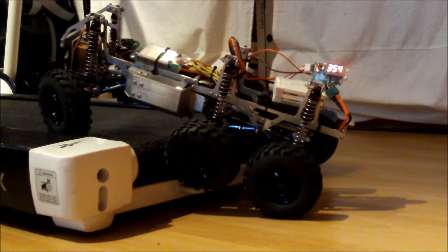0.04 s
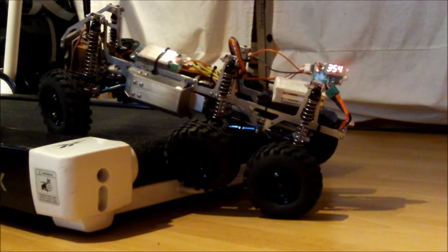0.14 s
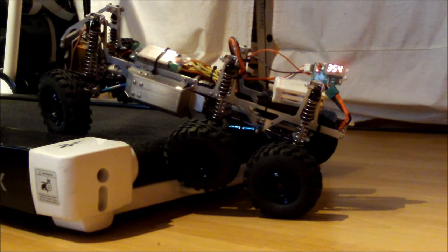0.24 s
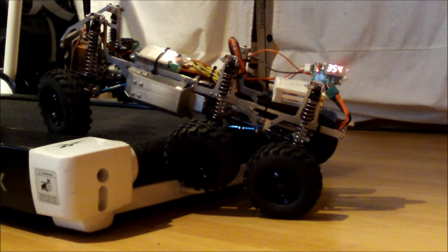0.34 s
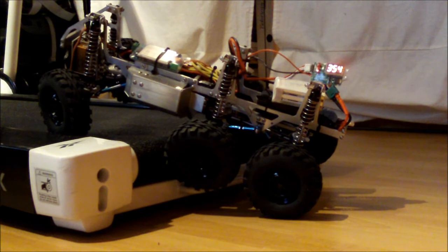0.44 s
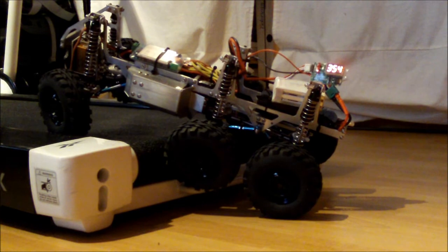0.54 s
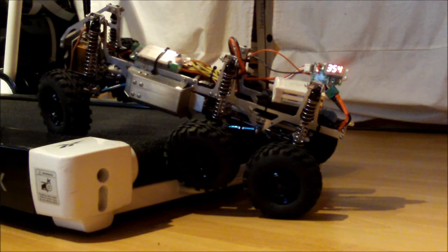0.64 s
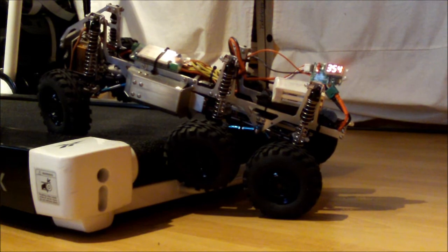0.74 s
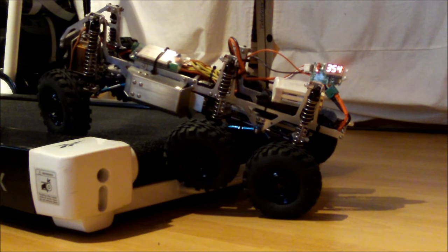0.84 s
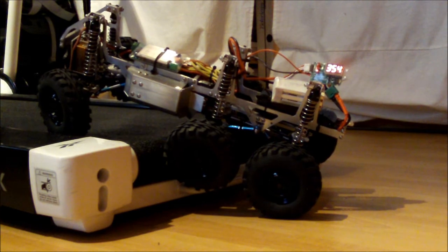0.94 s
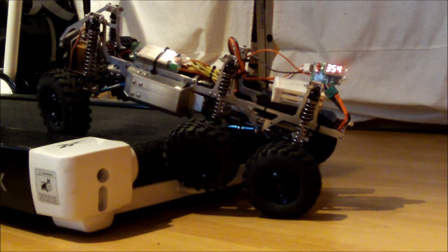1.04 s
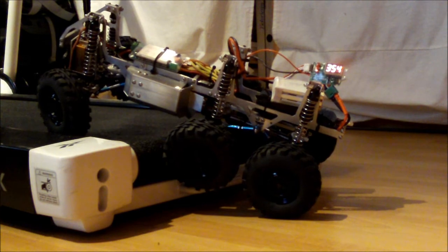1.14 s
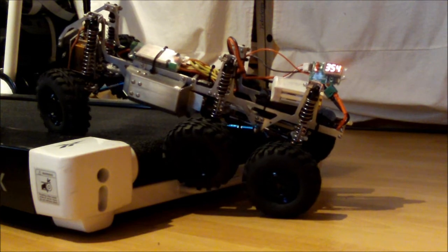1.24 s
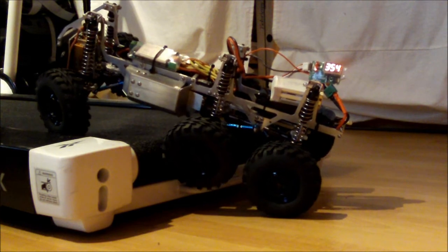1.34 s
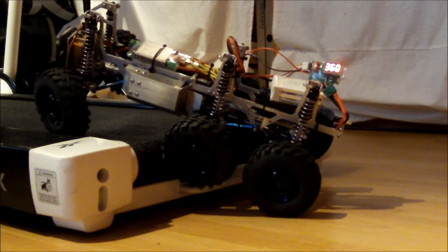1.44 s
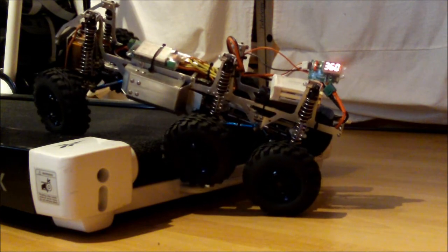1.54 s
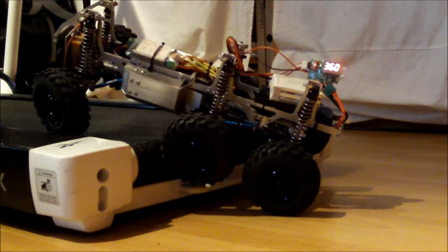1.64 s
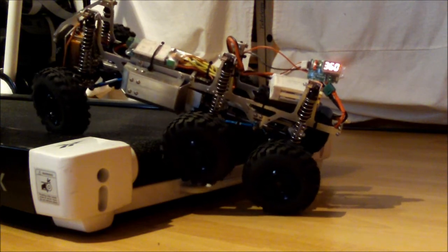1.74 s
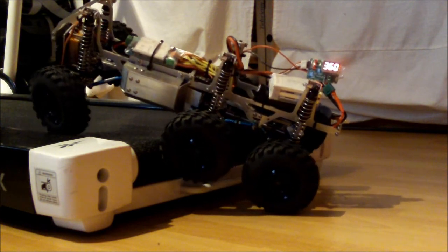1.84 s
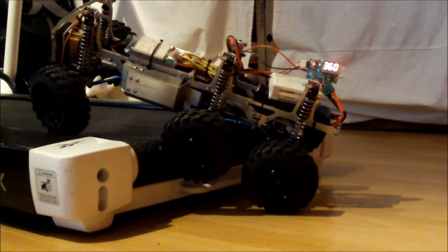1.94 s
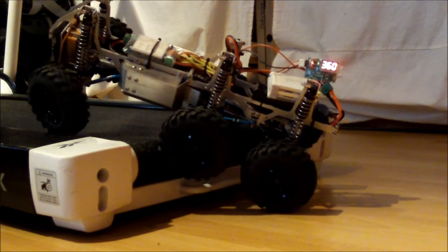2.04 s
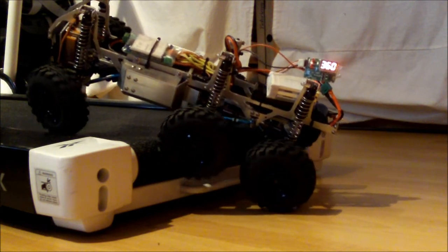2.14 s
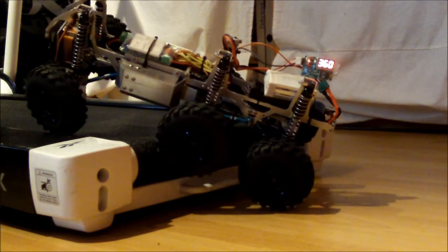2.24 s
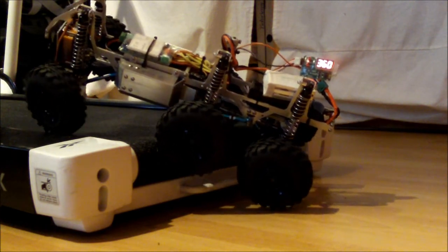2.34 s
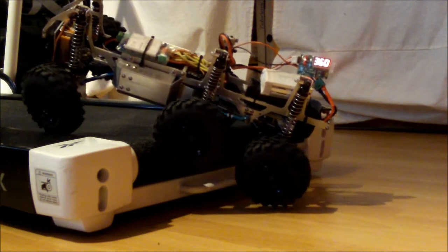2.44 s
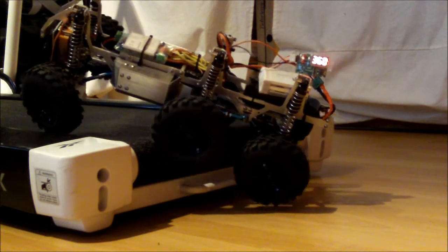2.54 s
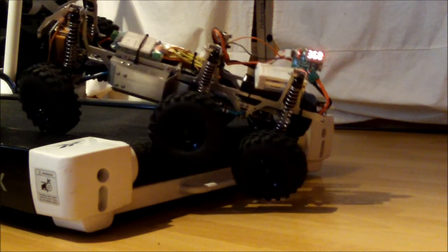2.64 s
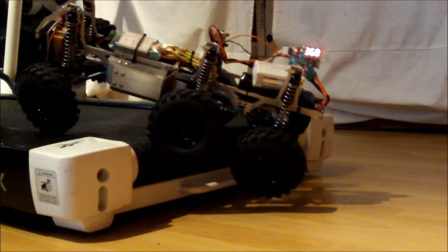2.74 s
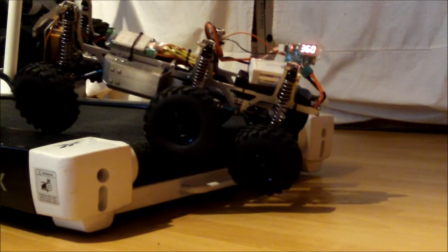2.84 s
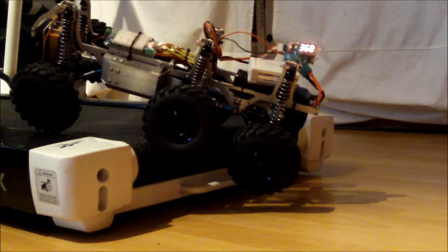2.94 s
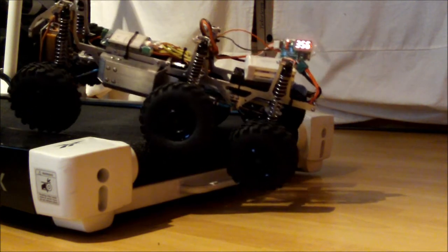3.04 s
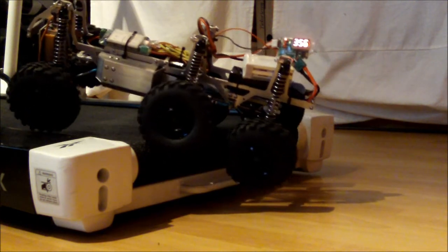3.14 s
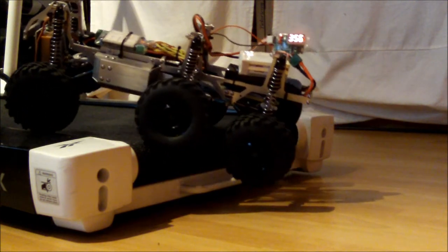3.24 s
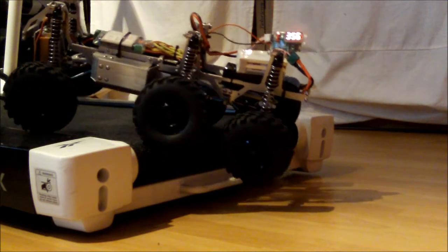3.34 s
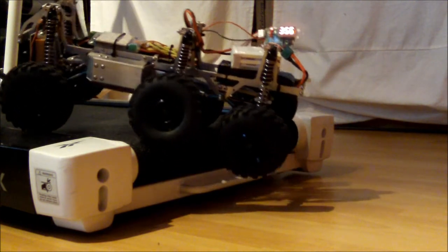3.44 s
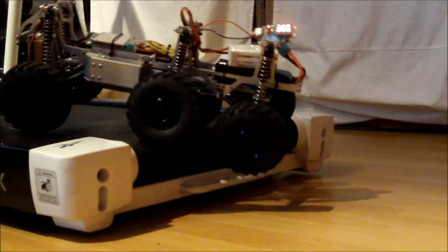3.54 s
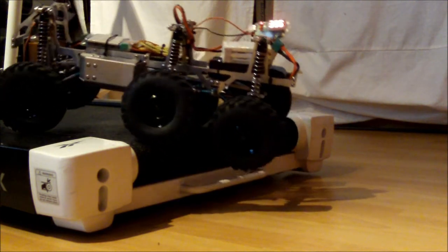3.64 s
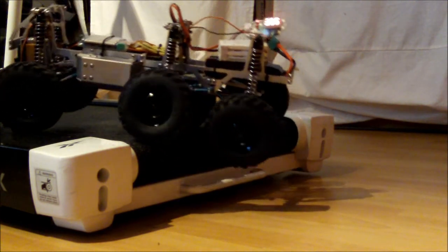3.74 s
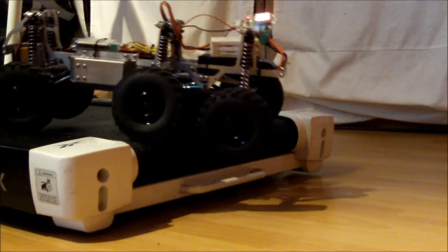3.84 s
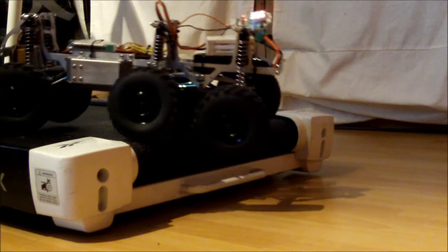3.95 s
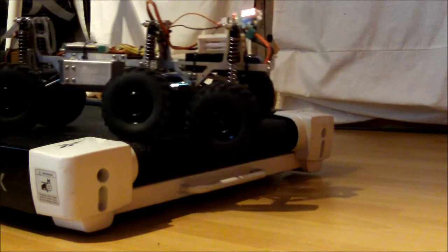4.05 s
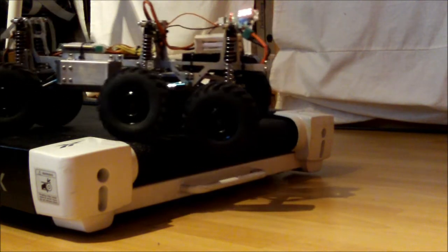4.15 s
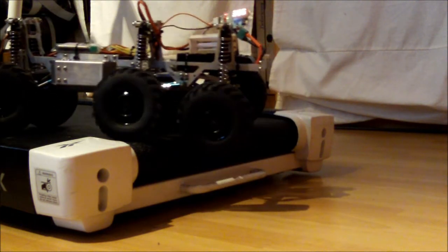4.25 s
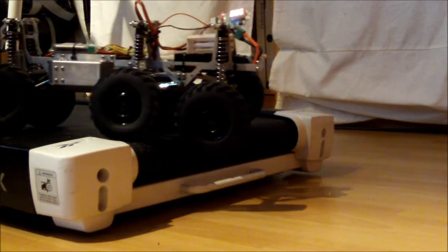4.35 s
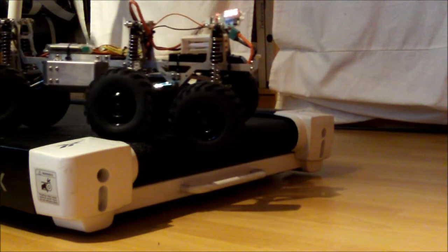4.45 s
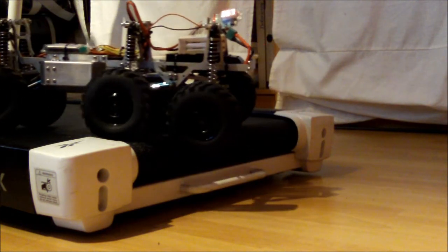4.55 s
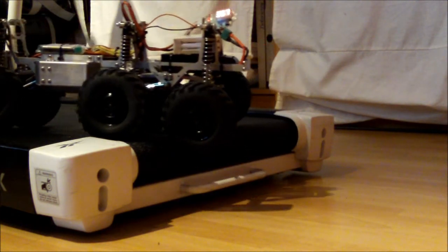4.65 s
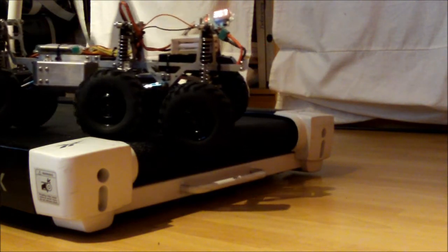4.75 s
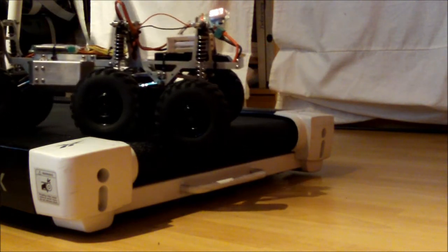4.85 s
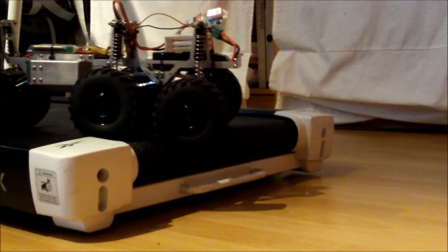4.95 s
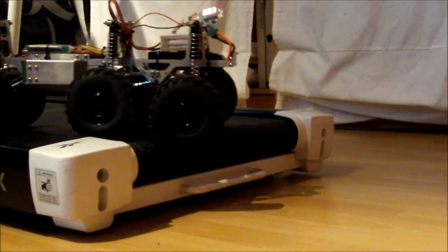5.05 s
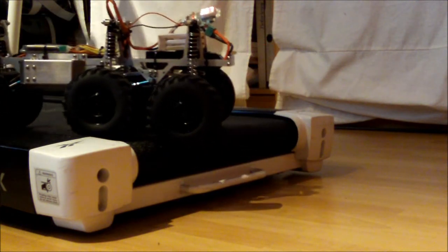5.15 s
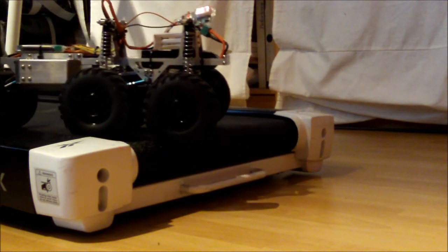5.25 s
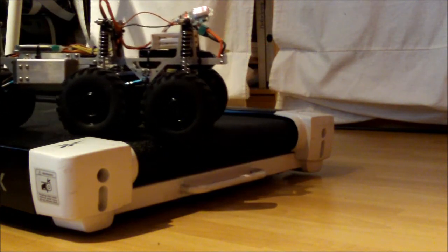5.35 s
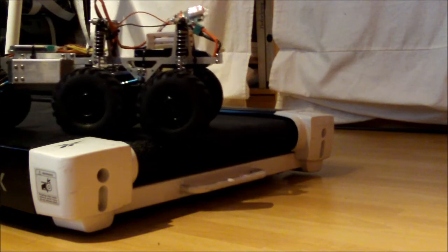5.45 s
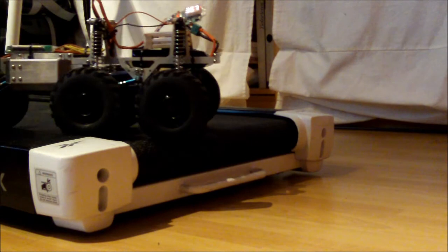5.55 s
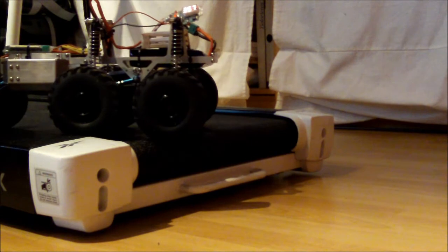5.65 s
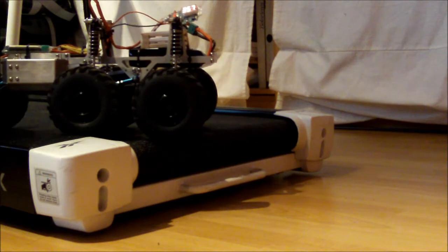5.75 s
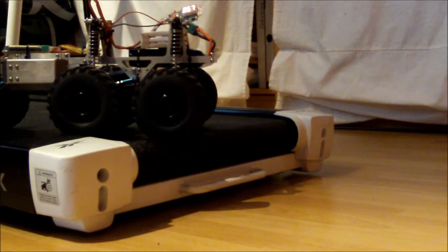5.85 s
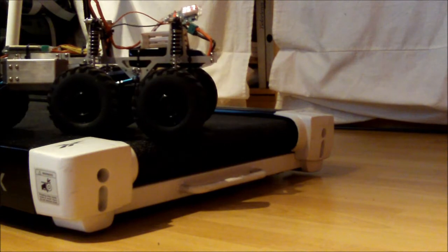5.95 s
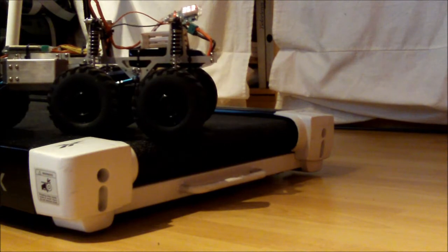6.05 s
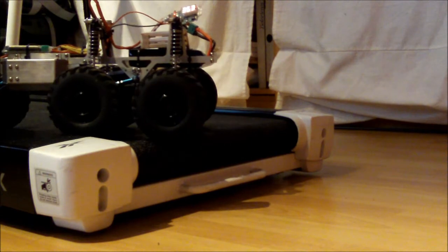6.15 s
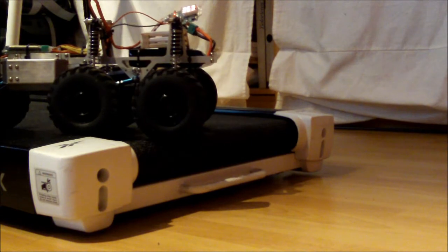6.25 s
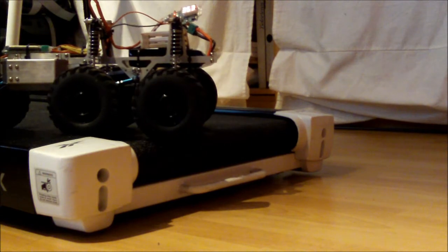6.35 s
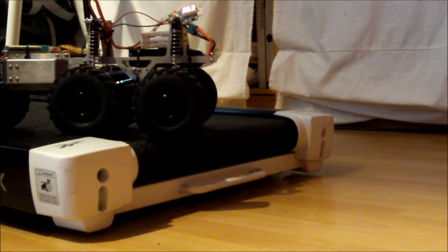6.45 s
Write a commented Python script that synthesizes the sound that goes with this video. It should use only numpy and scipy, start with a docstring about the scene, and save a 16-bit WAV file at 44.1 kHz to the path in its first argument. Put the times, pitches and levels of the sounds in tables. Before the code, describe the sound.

Close in a small room, a thin electric buzz and irregular dry metallic ticks come from a stalled model truck. After a second its gears catch, grinding in rapid throbbing pushes as it climbs. Around three and a half seconds the strain lifts into a rising, bright whine that holds, wavers downward and stops. Soft knocks follow, the buzz cuts, and one faint tick remains over low room hum.

```python
"""A thin electric buzz and dry, irregular ticks open over a low room hum: a model crawler truck, heard close
in a small room, stalls against a treadmill. Its gears then grind in short pushes as it climbs, run free with
a rising and falling whine, and stop. The buzz cuts after them, and one faint tick follows.
Gears are bursts of noise per tooth plus sine overtones of the mesh, rung through resonances; the buzz is
a train of pulses, the ticks are decaying sines with a noise crack, and the room is shaped noise and sines."""
import sys
import numpy as np
from scipy import signal
from scipy.fft import rfft, irfft, next_fast_len
from scipy.io import wavfile
from scipy.ndimage import uniform_filter1d, map_coordinates

SR = 44100
rng = np.random.default_rng(int(sys.argv[2]) if len(sys.argv) > 2 else 0)


def digitize_waveform(pressure):
    """Quantize a signal to 16-bit integers and store it at the path in sys.argv[1].

    Rows of a 2-D input are taken as channels; values are limited to [-1, 1].
    """
    field = np.atleast_2d(pressure).T
    bounded = np.clip(field, -1, 1)
    quanta = np.round(bounded * 32767).astype(np.int16)
    wavfile.write(sys.argv[1], SR, quanta)


N = 286650
TIME = np.arange(N) / SR

# room air: f/Hz, level/dB
ROOM_AIR = [(15, -22), (28, -0.5), (60, -7.5), (100, -7.5), (180, -8), (255, -17), (350, -13), (460, -16.5),
            (700, -14), (900, -19.5), (1700, -23.5), (4000, -26), (15000, -40.5)]
# steady hum tones: f/Hz, level/dB (rms)
HUM_TONES = [(118.4, -67.5), (160.5, -65.5), (207.9, -64.5), (322, -73)]
# how long the walls ring: f/Hz, t60/s
WALL_DECAY = [(200, 0.11), (1400, 0.31), (4000, 0.17), (12000, 0.14)]
# soft knocks as the truck settles on tyres and springs: t/s, level/dB, rise/s, decay/s, centre f/Hz
SETTLING_KNOCKS = [(5.741, -49.5, .002, 0.028, 4740), (5.878, -52, 0.013, 0.018, 3320),
                   (6.025, -47, 0.0088, 0.024, 860), (6.09, -54, 0.048, .022, 1600),
                   (6.102, -52, .003, 0.012, 5000)]
# speed controller buzz, strongest as the climb begins, weakest in mid-run: t/s, level/dB
BUZZ_LEVEL = [(0.4, -44.5), (1.2, -43.5), (3.0, -54), (5.5, -46.5), (5.75, -47)]
# colour of the buzz from the motor windings: f/Hz, level/dB
WINDING_COLOUR = [(330, 1), (660, -1), (1200, -3.5), (2500, -6), (4500, -3), (5200, 4), (6000, 4),
                  (6700, 1.5), (7300, -0.5), (9000, 1), (13200, -1), (15000, -7)]
# strengths of consecutive buzz overtones that sing in the motor can: level/dB
SINGING_LEVELS = [7, 2.5, 4.5, 0.5, 8, 7.5]
# single teeth slipping past while the gears stand nearly still: t/s, level/dB, main ring f/Hz
SLIPPING_TEETH = [(0.0433, -32, 3570), (0.0962, -37.5, 3500), (0.1171, -45.5, 3540), (0.3057, -39.5, 3600),
                  (0.3696, -35.5, 3500), (0.4993, -36, 3600), (0.5487, -34, 3560), (0.6235, -34, 3500),
                  (0.6764, -33, 3670), (0.6903, -30, 3630), (0.7013, -30, 3460), (0.7572, -36, 3540),
                  (0.7704, -35, 3630), (0.8769, -31, 3560), (0.8864, -29, 3520), (0.8954, -26.5, 3530),
                  (0.9044, -31, 3550), (0.9532, -29, 3570), (0.9597, -26.5, 3600), (0.9674, -31, 3540),
                  (0.9774, -34, 3660), (0.9884, -44, 3420), (1.0056, -29, 3590), (5.7418, -53, 3930),
                  (6.1868, -50, 3970), (6.3664, -52, 3930)]
# what else a tick rings in the gear housing, before its random spread: f/Hz, level/dB, t60/s
HOUSING_RINGS = [(876, -7.5, 0.018), (1080, -14, .024), (1400, -12, .015), (2830, -15.5, 0.018),
                 (4030, -9, 0.014), (5180, -5.5, 0.016), (5270, -11, .01)]
# gear speed through climb, free run and run-down: t/s, rate/tooth meshes per s
GEAR_SPEED = [(1.0, 210), (1.9, 240), (2.3, 280), (2.72, 298), (2.79, 280), (2.86, 315), (2.99, 305),
              (3.05, 247), (3.1, 262), (3.14, 290), (3.19, 300), (3.23, 261), (3.28, 260), (3.35, 342),
              (3.47, 362), (3.53, 402), (3.61, 404), (3.68, 465), (3.74, 483), (3.8, 519), (3.87, 521),
              (3.91, 552), (3.99, 564), (4.1, 563), (4.2, 568), (4.43, 564), (4.5, 545), (4.6, 540),
              (4.66, 520), (4.695, 489), (4.76, 486), (4.81, 455), (4.87, 470), (4.94, 432), (5.0, 450),
              (5.06, 425), (5.12, 452), (5.19, 405), (5.26, 432), (5.33, 400), (5.41, 350), (5.65, 110)]
# share of the full weight on the gears, easing once the truck is up: t/s, level/dB
GEAR_LOAD = [(2.0, -0.5), (2.7, -2.5), (3.15, -1), (3.5, -10.5), (3.8, -15), (4.5, -15.5), (5.2, -18),
             (5.5, -9)]
# the motor's effort between pushes: t/s, level/dB
MOTOR_EFFORT = [(1.05, -3.5), (1.45, -3.5), (1.9, -3.5), (2.25, -2.5), (2.45, -1), (2.8, -0.5), (3.1, 0),
                (3.6, 0.75), (4.2, 0.65), (5.3, 0.47)]
# the climbing motor's pushes, about fifteen a second: t/s, rise/dB
MOTOR_PUSHES = [(1.035, 3), (1.092, 9.5), (1.157, 7), (1.225, 6), (1.293, 10), (1.345, 8), (1.417, 3),
                (1.486, 4.5), (1.548, 9), (1.616, 8), (1.683, 5), (1.747, 8.5), (1.807, 8.5), (1.879, 4.5),
                (1.949, 8), (2.014, 8.5), (2.079, 5.5), (2.147, 8.5), (2.196, 7), (2.28, 5), (2.34, 7.5),
                (2.408, 4.5), (2.473, 7), (2.541, 4.5), (2.606, 6), (2.666, 8), (2.732, 5), (2.79, 5),
                (2.853, 2), (2.934, 2.5)]
# the whine swells and eases against the grinding: t/s, level/dB
WHINE_SWELL = [(2.2, -4), (2.7, -1), (2.95, 5), (3.25, 5.5), (3.42, 1), (3.72, -0.5), (3.88, 2), (4.03, -1),
               (4.09, 3), (4.2, -2.5), (4.62, -2.5), (4.73, 3.5), (4.82, -0.5), (5.22, 0), (5.38, 2),
               (5.48, -4)]
# overtones of the mesh before the resonances: multiple, level/dB, blur (relative depth of phase smear)
MESH_OVERTONES = [(1, -12, 0.29), (2, -11.5, .2), (3, -5, 0.095), (4, -9.5, 0.13), (5, -5.5, .2),
                  (6, -4, 0.33), (7, -3.5, 0.61), (8, -5, 0.44), (9, -1, 0.21), (10, 0.5, 0.27),
                  (11, 0.5, 0.27)]
# resonances that the whine sweeps through: f/Hz, width/Hz, level/dB
WHINE_RESONANCES = [(427, 19, -21), (564, 87, -16), (754, 86, -14), (925, 128, -9), (1078, 79, -10.5),
                    (1210, 69, -4.5), (1352, 71, -3), (1460, 28, 2), (1546, 38, 0), (2640, 44, -6),
                    (2843, 156, -6.5), (3425, 150, -7), (3914, 72, -1), (4490, 123, -10)]
# ringing of the strained chassis: f/Hz, width/Hz, level/dB
CHASSIS_RINGS = [(600, 40, -11), (802, 120, -3.5), (944, 61, 1.5), (1117, 30, -2), (1190, 30, -2.5),
                 (1440, 63, 2.5), (1498, 69, -5), (1680, 7.4, 2), (2797, 146, 2), (3570, 145, 5),
                 (3940, 96, 4)]
# ringing of the gearbox: f/Hz, width/Hz, level/dB
GEARBOX_RINGS = [(645, 800, -21.5), (1410, 200, -3), (2485, 22, 2), (2870, 620, -3), (3520, 120, 5.5),
                 (3893, 56, 8), (4960, 130, -17)]
# colour of the gear noise under load: f/Hz, level/dB
STRAINED_COLOUR = [(100, -50), (350, -13), (500, -18.5), (700, -4), (1000, -8), (1600, -1.5), (2100, -11),
                   (2700, -71), (4000, 6.5), (4600, -10), (6500, -11.5), (9000, -25)]
# colour of the gear noise running free: f/Hz, level/dB
FREE_COLOUR = [(100, -38), (400, -17), (700, -34), (1050, -10.5), (1500, 2.5), (1850, -8.5), (2250, -13),
               (2700, -4.5), (3300, 0.5), (4000, -3.5), (4900, -6.5), (7000, -9), (9000, -40)]
# colour of the brush hiss under load: f/Hz, level/dB
PRESSED_BRUSHES = [(6000, -30), (8500, -0.5), (10000, 1.5), (11200, 0.5), (12300, 6.5), (13250, 2),
                   (13900, -3), (14800, 12), (15300, -24)]
# colour of the brush hiss running free: f/Hz, level/dB
FREE_BRUSHES = [(6000, -27.5), (8400, -10.5), (9600, -3.5), (11000, -4.5), (12400, 1), (13300, 1),
                (14100, 0.5), (14800, -39), (15300, -28)]

NOTCH_HZ, TOP_HZ = 7950, 15400  # the recorder's notch and band limit
ECHO_SHIFT_S = 0.3  # a new pattern of reflections takes over this often
CHOP_HZ, FIRST_SINGING = 331.9, 15  # buzz pitch, its first singing overtone
BUZZ_OFF_S, BUZZ_FADE_S = 6.2, 0.1
TICK_DB, TICK_T60_S, TICK_RISE_S = 6, 0.01, 0.001  # lift of every tick, main ring decay, attack
CRACK_DB = -8  # against the main ring
START_S, START_FADE_S = 0.96, 0.07  # the gears break free
STOP_S, STOP_FADE_S = 5.625, 0.25  # the motor runs down
FULL_SPEED = 570  # reference speed, tooth meshes per s
PINION_TEETH, WORN_SHARE = 13, 0.55  # motor pinion; share of the scraping that repeats every turn
# level at full speed, power of speed, change under full load
GRIND_DB, GRIND_GROWS, GRIND_LOAD_DB = -23.5, 1.524, 2
BRUSH_DB, BRUSH_GROWS, BRUSH_LOAD_DB = -24.5, 1.49, -9
PUSH_WIDTH_S = 0.018  # standard deviation of a bell-shaped push
SWELL_EASES, PUSH_SINGS = 0.65, 0.6  # dB of grind lost per dB of swell, dB of whine gained per dB of push
WHINE_CHOKE, RUN_DOWN_POWER = 0.62, 1.8  # whine share lost under full load; it fades faster than the grind
STRAIN_TILT_DB, PIVOT_ORDER = 8, 5  # whine darkens per octave at full load, about this multiple
FLUTTER_DB, RUNOUT = 2.3, 0.27  # overtone flutter, sideband depth (both scale random curves)
STRAIN_RING_DB = -4  # high ring under load


def amp(db):
    """Decibels to gain."""
    return 10 ** (np.asarray(db) / 20)


def unit(x):
    """Scale to rms 1."""
    return x / np.sqrt(np.mean(x ** 2) + 1e-20)


def along(points, hz):
    """Interpolate (f/Hz, value) points on a log frequency axis."""
    f, value = np.transpose(points)
    return np.interp(np.log(hz + 1), np.log(f + 1), value)


def curve(points):
    """Draw (t/s, value) points as a curve with one value per sample."""
    s, value = np.transpose(points)
    return np.interp(TIME, s, value)


def between(start, stop, fade_in, fade_out):
    """Gate that is open from start to stop, with linear fades inside."""
    return np.clip(np.minimum((TIME - start) / fade_in, (stop - TIME) / fade_out), 0, 1)


def wobble(rate):
    """Smooth random curve with this many knots a second."""
    knots = rng.standard_normal(int(N * rate / SR) + 4)
    return map_coordinates(knots, [TIME * rate])


def filtered(x, response):
    """Apply a complex response of frequency to x."""
    m = next_fast_len(N + SR // 2)
    return irfft(rfft(x, m) * response(np.fft.rfftfreq(m, 1 / SR)), m)[..., :N]


def coloured(x, spectrum):
    """Equalise x along (f/Hz, level/dB) points, at rms 1."""
    return unit(filtered(x, lambda hz: amp(along(spectrum, hz))))


def rung(x, modes):
    """Ring x through parallel band-pass resonances (f/Hz, width/Hz, level/dB) of alternating sign."""
    def response(f):
        total = 0
        for k, (centre, width, db) in enumerate(modes):
            damping = 1j * f * width
            total = total + (-1) ** k * amp(db) * damping / (centre * centre - f * f + damping)
        return total
    return filtered(x, response)


def meshing(phase, scrape, scatter_db, worn=0):
    """Noise dying over each tooth, every tooth of its own strength; the worn share repeats per pinion turn."""
    strength = amp(scatter_db * rng.standard_normal(N)[phase.astype(int)])
    surface = rng.standard_normal(PINION_TEETH * SR // FULL_SPEED)
    turn = phase / PINION_TEETH % 1
    repeated = map_coordinates(surface, [turn * (len(surface) - 1)])
    texture = np.sqrt(1 - worn) * rng.standard_normal(N) + np.sqrt(worn) * repeated
    return unit(strength * np.exp(-(phase % 1) / scrape) * texture)


def background():
    """Shaped-noise air and unsteady sine hum; only the deepest rumble differs, inverted between the ears."""
    air = amp(-56) * coloured(rng.standard_normal(N), ROOM_AIR)
    hum = 0
    for hz, db in HUM_TONES:
        sine = np.sqrt(2) * np.sin(2 * np.pi * hz * TIME + 0.3 * wobble(3))
        hum = hum + amp(db + 1.5 * wobble(4)) * sine
    rumble_colour = [(20, 0), (60, -5), (150, -18), (500, -25), (4000, -42)]
    rumble = amp(-67) * coloured(rng.standard_normal(N), rumble_colour)
    return air + hum + np.array([rumble, -rumble])


def walls(x):
    """Reflections as decaying noise; random tails crossfade steadily so no one pattern colours the sound."""
    step = int(ECHO_SHIFT_S * SR)
    source, out = np.pad(x, (step, 2 * step)), np.zeros(N + 3 * SR)
    fade = np.sqrt(np.hanning(2 * step))
    for start in range(0, N + step, step):
        hz, t, bands = signal.stft(rng.standard_normal(SR // 2), SR, nperseg=256)
        decay = amp(-60 * t / along(WALL_DECAY, hz)[:, None])
        tail = signal.istft(bands * decay, SR, nperseg=256)[1]
        echo = signal.fftconvolve(source[start:start + 2 * step] * fade, tail / np.linalg.norm(tail))
        out[start + SR // 200:][:len(echo)] += echo  # 5 ms behind the direct sound
    return out[step:step + N]


def settling():
    """Soft knocks and rubs as the truck comes to rest: noise humped around a centre, rising then decaying."""
    out = np.zeros(N)
    for s, db, rise, decay, hz in SETTLING_KNOCKS:
        colour = [(hz / 8, -30), (hz / 2, -3), (hz, 0), (hz * 2, -10), (hz * 8, -40)]
        rub = coloured(rng.standard_normal(N), colour)
        attack = np.clip((TIME - s) / rise, 0, 1)
        out += amp(db) * attack * np.exp(-np.maximum(TIME - s - rise, 0) / decay) * rub
    return out


def pulse_train(phase, strength_db):
    """Repeat one cycle whose overtones have the given strengths and random delays."""
    delays = np.exp(2j * np.pi * rng.random(len(strength_db)))
    cycle = irfft(np.r_[0, amp(strength_db) * delays], 2 ** 11)
    return unit(np.interp(phase % 1, np.arange(len(cycle)) / len(cycle), cycle))


def controller():
    """Chopped current kicks the windings at a nearly fixed rate; its wavering overtones grow rougher."""
    phase = CHOP_HZ * TIME + 0.008 * wobble(9)
    orders = np.arange(1, int(TOP_HZ / CHOP_HZ) + 1)
    # the motor can answers the overtones unevenly
    strength_db = 1.5 * rng.standard_normal(len(orders)) * (orders > FIRST_SINGING)
    strength_db[FIRST_SINGING - 1:][:len(SINGING_LEVELS)] = SINGING_LEVELS
    steady = pulse_train(phase, strength_db)
    wavering = sum(wobble(12) * pulse_train(phase, strength_db) for _ in range(3))
    kicks = unit(steady + 0.35 * wavering)
    rough = np.interp(TIME, [1, 5.5], [0.45, 0.95])
    rasp = meshing(phase, scrape=0.83, scatter_db=2.6)
    buzz = np.sqrt(1 - rough) * kicks + np.sqrt(rough) * rasp
    switch_off = np.clip((BUZZ_OFF_S - TIME) / BUZZ_FADE_S, 0, 1)
    return amp(curve(BUZZ_LEVEL)) * switch_off * coloured(buzz, WINDING_COLOUR)


def stall_ticks():
    """A slipping tooth gives a noise crack and decaying sines of the housing, varied every time."""
    t = np.arange(SR // 25) / SR
    out = np.zeros(N)
    for s, db, ring_hz in SLIPPING_TEETH:
        ring = amp(-60 * t / TICK_T60_S) * np.sin(2 * np.pi * ring_hz * t)
        housing = 0
        for hz, level, t60 in HOUSING_RINGS:
            decay = amp(level + rng.normal(0, 1.6) - 60 * t / t60)
            housing = housing + decay * np.sin(2 * np.pi * hz * rng.normal(1, 0.034) * t)
        crack = amp(CRACK_DB - 60 * t / 0.012) * uniform_filter1d(rng.standard_normal(len(t)), size=4)
        attack = 1 - np.exp(-t / TICK_RISE_S)
        out[round(s * SR):][:len(t)] += amp(db + TICK_DB) * attack * (ring + housing + crack)
    return out


def motor_pushes():
    """Bell-shaped level rises in dB as the motor pushes."""
    return sum(db * np.exp(-0.5 * ((TIME - s) / PUSH_WIDTH_S) ** 2) for s, db in MOTOR_PUSHES)


def brush_hiss(phase, load, level_db):
    """Brushes spark with every tooth mesh; the hiss changes colour with load and pulses unevenly."""
    sparks = meshing(phase, scrape=1.0, scatter_db=0.9)
    pressed = np.sqrt(load)
    hiss = pressed * coloured(sparks, PRESSED_BRUSHES) + (1 - pressed) * coloured(sparks, FREE_BRUSHES)
    # about thirty pulses a second
    flicker_db = 1.4 * np.sin(2 * np.pi * 33 * TIME + wobble(3.76)) + 1.2 * wobble(45)
    return amp(level_db + flicker_db) * hiss


def gearbox_ring_out():
    """The gearbox rings on as the motor runs down: noise through narrow modes, swelling then dying."""
    modes = [(1190, 42, -1), (1412, 29, -3), (1540, 44, -3.5), (3910, 90, -8)]
    ringing = unit(rung(rng.standard_normal(N), modes))
    level_db = np.interp(TIME, [5.2, 5.42, 5.7, 6.1], [-65, -33.5, -62, -110])
    return amp(level_db) * ringing * between(5.2, 6.7, 0.016, 0.016)


def grinding(phase, load):
    """Tooth scrapes ring the chassis under load and the gearbox when free, with a high ring near full load."""
    knocks = unit(rung(meshing(phase, 0.45, 2.3, WORN_SHARE), CHASSIS_RINGS))
    strained = unit(knocks + amp(-6) * coloured(meshing(phase, 1.0, 2.0), STRAINED_COLOUR))
    ringing = unit(rung(meshing(phase, 0.68, 2.0, WORN_SHARE), GEARBOX_RINGS))
    free = unit(coloured(meshing(phase, 0.39, 2.0, WORN_SHARE), FREE_COLOUR) + amp(-2.5) * ringing)
    high_ring = unit(rung(meshing(phase, 0.32, 1.0), [(5150, 67, 0)]))
    ease = np.sqrt(1 - load ** 2)
    return amp(3) * load * strained + amp(-3) * ease * free + amp(STRAIN_RING_DB) * load ** 9 * high_ring


def mesh_tone(phase, order, blur):
    """One mesh overtone, phase-smeared by backlash and flanked by sidebands that come and go with runout."""
    slack = blur * (1.5 * wobble(30) + 0.1 * wobble(220))
    turn = 2 * np.pi * phase / 5.2 + wobble(12)
    once, twice = (1 + wobble(7) / 2) * np.sin(turn), (1 + wobble(7)) * np.sin(2 * turn)
    runout = 1 + RUNOUT * (once + twice)
    return unit(runout * amp(FLUTTER_DB * wobble(28)) * np.sin(2 * np.pi * order * phase + slack))


def whine(phase, load):
    """Sine overtones of the mesh swell as they sweep through fixed resonances; strain darkens them."""
    partials = 0
    for order, db, blur in MESH_OVERTONES:
        tilt_db = STRAIN_TILT_DB * load * np.log2(max(order, 2) / PIVOT_ORDER)
        partials = partials + amp(db - tilt_db) * mesh_tone(phase, round(order), blur)
    return rung(partials, WHINE_RESONANCES)


def drivetrain():
    """Gears grind and sing and brushes hiss at the pace of the shaft, louder the faster it turns."""
    speed = curve(GEAR_SPEED)
    pace_db = 20 * np.log10(speed / FULL_SPEED)
    load = np.clip(amp(curve(GEAR_LOAD)), 0, 1)
    push_db, swell_db = motor_pushes(), curve(WHINE_SWELL)
    surge_db = curve(MOTOR_EFFORT) + push_db
    running = between(START_S, STOP_S, START_FADE_S, STOP_FADE_S)
    # a loaded motor turns unevenly and quickens with each push
    unevenness = 1 + (0.004 + 0.025 * load ** 6) * wobble(40)
    phase = np.cumsum(speed * unevenness * amp(0.1 * push_db)) / SR

    grind = amp(-SWELL_EASES * np.maximum(swell_db, 0)) * grinding(phase, load)
    overtones = amp(swell_db + PUSH_SINGS * push_db) * whine(phase, load)
    whine_share = (1 - WHINE_CHOKE * load ** 2) * running ** RUN_DOWN_POWER
    gear_db = GRIND_DB + GRIND_GROWS * pace_db + GRIND_LOAD_DB * load ** 2
    gears = amp(gear_db + surge_db + 0.48 * wobble(50)) * (grind + whine_share * overtones)

    brush_db = BRUSH_DB + BRUSH_GROWS * pace_db + BRUSH_LOAD_DB * np.sqrt(load)
    brushes = brush_hiss(phase, load, brush_db + 1.56 * surge_db)
    return (gears + brushes) * running + gearbox_ring_out()


def scene():
    """The truck plays dry and through the walls; the thin buzz is mixed in dry, without wall reflections."""
    truck = drivetrain() + stall_ticks() + settling()
    return amp(-0.52) * truck + amp(-6.5) * walls(truck) + amp(-4) * controller() + background()


def record(dry):
    """The recorder cuts a narrow notch in the treble and stops at a steep band limit."""
    def response(hz):
        offset = (hz - NOTCH_HZ) ** 2
        return offset / (offset + 380 ** 2) * (hz < TOP_HZ)
    return filtered(dry, response)


dry = scene()
out = record(dry)
digitize_waveform(out)
```